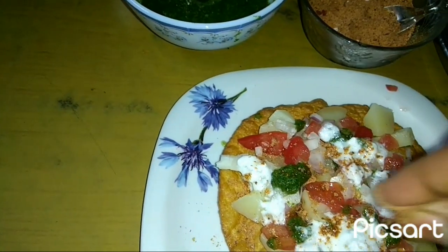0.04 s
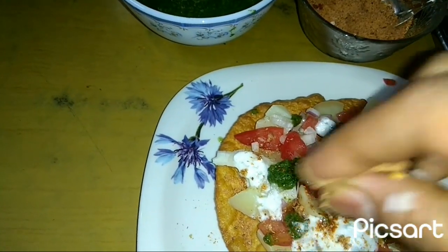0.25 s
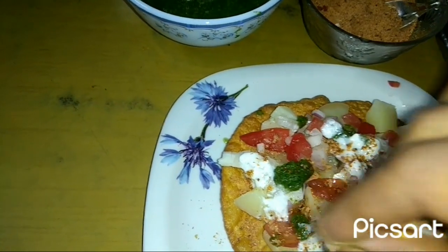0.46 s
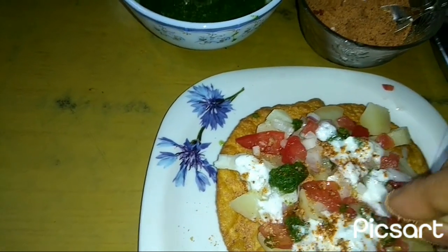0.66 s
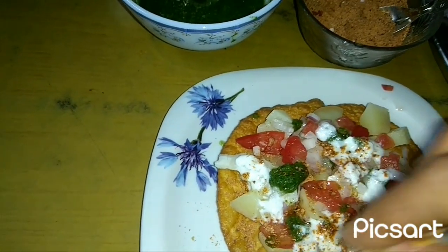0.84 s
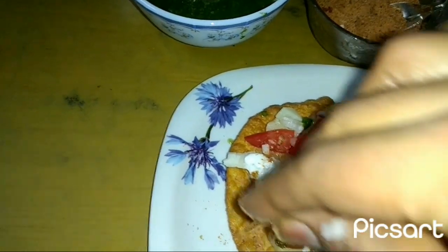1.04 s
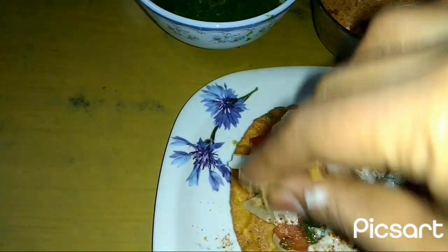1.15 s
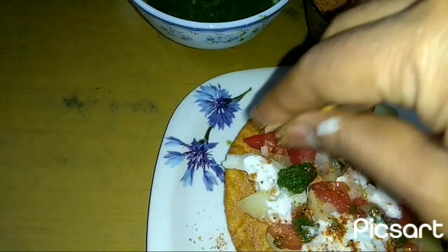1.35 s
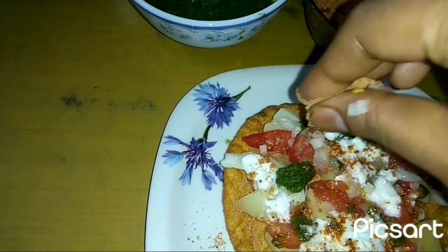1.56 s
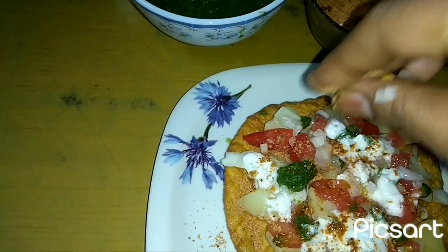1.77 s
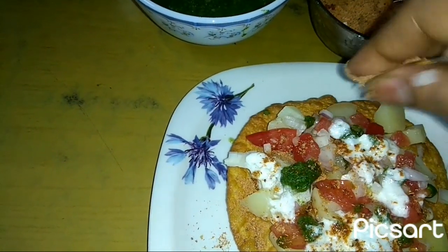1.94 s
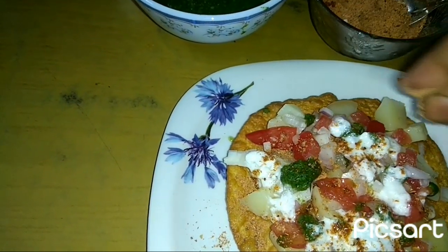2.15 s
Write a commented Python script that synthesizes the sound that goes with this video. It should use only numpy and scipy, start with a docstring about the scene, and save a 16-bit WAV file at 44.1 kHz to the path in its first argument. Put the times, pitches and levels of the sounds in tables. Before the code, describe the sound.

Fingertips rub spice powder over a plate in short, dry, scratchy strokes, close and mostly on the right. The fingers slip with a sharp snap at about 0.25 seconds, then more weakly at 1.05 and 1.9, each ringing briefly in a small kitchen. The rasping is strongest around 1.2 to 1.4 seconds and again from 1.8 to 2. Soft, low handling bumps come and go over a faint room hum.

```python
"""A small kitchen, a hand-held stereo phone close to fingertips rubbing spice powder over a plate.
The grains rasp in short strokes; three times the fingers stick and slip with a snap that rings in the room.
The hand holding the phone bumps it softly, over a faint room hum.
The left microphone lies in the phone's shadow, so the fingers are heard mostly on the right."""
import sys
import numpy as np
from scipy import signal
from scipy.fft import rfft, irfft
from scipy.io import wavfile

SR = 44100
rng = np.random.default_rng(int(sys.argv[2]) if len(sys.argv) > 2 else 0)


def wrap_up_sound(samples):
    """Save the sound to the file named by the first command line argument, as 16-bit audio."""
    columns = np.atleast_2d(samples).T
    # keep every value between -1 and 1, then stretch to whole-number steps
    tamed = np.clip(columns, -1, 1)
    steps = np.round(tamed * 32767).astype(np.int16)
    wavfile.write(sys.argv[1], SR, steps)


N = 97020

# Strokes of finger on thumb. Each row: peak time in seconds, level in dB, rise and fall in seconds,
# sizzle relative to rasp in dB, left relative to right in dB.
RUB_STROKES = [(.03, -64, 0.12, 0.053, -6, -7), (0.207, -49.5, 0.037, 0.09, 2, -0.5),
               (0.431, -45.5, 0.072, 0.038, -6.5, -2.5), (.524, -53.5, 0.0086, 0.012, 4.5, -7),
               (.685, -66, 0.011, 0.029, -28.5, -2.5), (0.782, -46, 0.014, .012, 2.5, -0.5),
               (.84, -62, .04, 0.036, -15, -8.5), (1.035, -52.5, 0.029, 0.028, 6, -4),
               (1.202, -39, 0.069, 0.045, -8, -5.5), (1.328, -41.5, 0.06, 0.077, -4, -8.5),
               (1.402, -46, 0.024, 0.01, -8, -10.5), (1.589, -53.5, 0.02, 0.013, 1.5, -11),
               (1.755, -48, 0.0096, 0.027, -20.5, -9.5), (1.792, -35, 0.0082, 0.0084, -9, -1),
               (1.83, -49.5, .035, 0.085, -5, -5), (1.963, -36.5, 0.063, 0.055, -10, -3),
               (2.104, -61, 0.023, 0.07, -20, 8.5), (2.179, -40.5, 0.0083, 0.007, 1, -12)]
# Single coarse grains cracking. Each row: time in seconds, level in dB, left relative to right in dB.
GRAIN_TICKS = [(.191, -51, 18), (.215, -47.5, 18), (1.745, -50, -9), (1.754, -47, -3.5), (2.004, -40, -6)]
# Handling bumps. Each row: peak time and width in seconds, pitch in Hz, left and right levels in dB.
PHONE_BUMPS = [(0.051, 0.014, 58.3, -34, -60), (0.123, 0.061, 52.5, -61, -46.5),
               (0.311, 0.034, 55, -61, -41), (.668, 0.0063, 60, -48, -34), (0.699, 0.02, 54, -38.5, -49.5),
               (.727, 0.0071, 80, -32, -40.5), (0.791, 0.055, 56.7, -47, -58),
               (0.949, 0.02, 60.7, -47, -42), (1.001, 0.013, 56.8, -34, -35.5),
               (1.69, 0.025, 54.5, -47.5, -60), (2.041, 0.0096, 59, -38.5, -58),
               (2.173, 0.029, 55.6, -60, -51)]
# Dull scrapes of skin. Each row: peak time, rise and fall in seconds, pitch and width in Hz, level in dB.
SKIN_SCUFFS = [(0.189, 0.021, 0.084, 418, 296, -59), (0.253, 0.0047, 0.021, 1450, 800, -41),
               (.57, 0.034, .018, 9600, 2200, -52), (.578, 0.031, 0.022, 860, 502, -63),
               (0.687, 0.015, 0.036, 6450, 2010, -57), (.815, 0.0097, 0.033, 2840, 590, -59.5),
               (1.052, 0.0065, 0.028, 900, 550, -43), (1.2, 0.035, 0.027, 2430, 547, -54.5),
               (1.61, 0.029, 0.033, 327, 194, -57), (1.755, .008, 0.02, 2200, 604, -64),
               (1.93, 0.0082, .008, 709, 400, -47.5), (1.96, 0.056, 0.065, 3330, 1200, -54),
               (2.098, .008, 0.029, 3430, 2330, -55)]
# Finger slips, a few to a snap. Each row: time in seconds, crack level in dB, the hollow's pitch and
# lower width in Hz, its level in dB, left relative to right in dB.
FINGER_SLIPS = [(0.234, -15.5, 3140, 700, -32, 5.5), (0.243, -27, 2780, 503, -28, 6),
                (0.2509, -13, 2820, 400, -17, 8), (0.2527, -8.5, 2584, 590, -14, 0.5),
                (0.255, -14, 3400, 900, -17, -3), (1.0350, -26.5, 2000, 196, -27.5, -3),
                (1.0460, -28, 2000, 200, -23.5, 3), (1.0580, -41, 2067, 200, -27, 0),
                (1.9040, -28, 2060, 262, -38, -9.5), (1.916, -34, 2110, 253, -25.5, 2),
                (1.929, -25.5, 2700, 700, -43, 1)]
# Dull finger knocks. Each row: peak time and fall in seconds, pitch in Hz, level in dB.
FINGER_KNOCKS = [(0.254, .004, 351.8, -36), (1.042, 0.0038, 785, -35), (1.076, 0.0093, 371.6, -38),
                 (1.928, 0.0045, 637, -44)]
# Spectra of room tone, coarse grains, fine grains and a slip's crack.
# Each row: frequency in Hz, relative spectral density in dB.
ROOM_TONE_SPECTRUM = [(25, -32.5), (40, -22.5), (58, -1), (100, 0), (160, -2.5), (230, 3.5), (340, -2.5),
                      (480, -15.5), (750, -9.5), (1100, -13.5), (1800, -19), (4000, -26), (9000, -26.5),
                      (16000, -35)]
RASP_SPECTRUM = [(500, -30), (1500, -21.5), (2300, -18), (3200, -19), (4500, -18), (5600, -9), (7000, -6),
                 (8300, 1), (10000, -2), (11500, -5.5), (13000, -19), (16000, -32)]
SIZZLE_SPECTRUM = [(500, -42), (7000, -29), (10500, -14.5), (12500, 0.5), (14500, -3), (16000, -7.5)]
CRACK_SPECTRUM = [(300, -32.5), (1000, -30), (1600, -19.5), (2200, -11.5), (3000, -16), (3800, -10),
                  (4700, -15), (6000, -2.5), (7000, -3), (7900, 3), (9700, 1), (11000, -7.5), (13000, -7),
                  (15000, -12.5), (16500, -22)]
# The phone's shadow on the left microphone. Each row: frequency in Hz, gain in dB.
LEFT_MIC_SHADOW = [(60, -5.5), (200, -11), (400, -12), (1000, -9.5), (2000, -12.5), (2900, -19),
                   (4200, -11), (6500, -16), (9000, -23), (11000, -4), (13000, -3), (15000, 2)]

ROOM_TONE_DB, MAINS_HZ, MAINS_DB = -57.5, 102.7, -72
GRAINS_PER_S, GRAIN_SPREAD_DB, SIZZLE_TRIM_DB = 6700, 1.7, -0.5
FLUTTER_DB, FLUTTER_PER_S = 1.0, 60
SLIP_S, TICK_RISE_S = 0.0012, 0.0012
ROOM_BUILD_S, ROOM_T60_S, ROOM_TREBLE_T60_S = 0.004, 0.26, 0.23
LEFT_LAG_S, TOP_HZ = 0.00014, 15450
TIME = np.arange(N) / SR
BIN_HZ = np.fft.rfftfreq(2048, 1 / SR)


def undb(db):
    """Decibels to gain."""
    return 10 ** (np.asarray(db) / 20)


def unit_rms(x):
    """Scale to an rms of 1."""
    return x / np.sqrt(np.mean(x ** 2))


def butter(x, hz, kind):
    """Gentle Butterworth filter."""
    return signal.sosfilt(signal.butter(2, hz, kind, fs=SR, output="sos"), x)


def curve(points):
    """Gain in dB at each bin, joining the points on a log-frequency axis."""
    hz, db = np.array(points, float).T
    return np.interp(np.log(BIN_HZ + 1), np.log(hz), db)


def resonance(hz, below_hz, above_hz):
    """Gain in dB of one broad resonance, with a width for each flank."""
    offset = BIN_HZ - hz
    return -29 * np.log10(1 + (offset / np.where(offset < 0, below_hz, above_hz)) ** 2)


def response(db):
    """Minimum-phase impulse response with the given gain at each bin."""
    cepstrum = irfft(np.log(undb(db)))
    half = len(cepstrum) // 2
    cepstrum[1:half] *= 2
    cepstrum[half + 1:] = 0
    return irfft(np.exp(rfft(cepstrum)))


def colour(x, db):
    """Filter that keeps the power of white noise."""
    impulse = response(db)
    return signal.fftconvolve(x, impulse[None] / np.linalg.norm(impulse), axes=-1)[:, :x.shape[1]]


def stroke(at, rise, fall):
    """Swell to a peak and fade."""
    return np.exp(-(np.abs(TIME - at) / np.where(TIME < at, rise, fall)) ** 1.5)


def grains():
    """Dense tiny clicks of unequal strength, mostly shared by the two microphones."""
    hits = rng.random((3, N)) < GRAINS_PER_S / SR
    clicks = hits * rng.standard_normal((3, N))
    clicks *= undb(GRAIN_SPREAD_DB * np.minimum(rng.exponential(size=(3, N)), 4))
    return unit_rms(clicks[:2] + 2.2 * clicks[2])


def flutter():
    """Uneven grip of skin on powder: a quick random waver of the gain."""
    knots = rng.standard_normal(1024)
    return undb(FLUTTER_DB * np.interp(TIME * FLUTTER_PER_S, np.arange(len(knots)), knots))


def room(x, wet_db):
    """Add the dense, short echo of table top and tiled walls."""
    t = np.arange(SR // 2) / SR
    low = butter(rng.standard_normal((2, len(t))), 5000, "low") * undb(-60 * t / ROOM_T60_S)
    high = butter(rng.standard_normal((2, len(t))), 5000, "high") * undb(-60 * t / ROOM_TREBLE_T60_S)
    echo = (low + high) * (1 - np.exp(-t / ROOM_BUILD_S))
    echo /= np.linalg.norm(echo, axis=1, keepdims=True)
    return x[:, :N] + undb(wet_db) * signal.fftconvolve(x, echo, axes=-1)[:, :N]


def room_tone():
    """Faint steady kitchen noise with a trace of mains hum."""
    noise = rng.standard_normal((3, N))
    air = colour(unit_rms(noise[:2] + 3.3 * noise[2]), curve(ROOM_TONE_SPECTRUM))
    return undb(ROOM_TONE_DB) * air + undb(MAINS_DB) * np.sin(2 * np.pi * MAINS_HZ * TIME)


def rubs():
    """Powder rubbed close to the phone: coarse grains rasp, fine ones sizzle and a few crack singly."""
    coarse_power, fine_power = 0, 0
    for at, db, rise, fall, sizzle_db, pan_db in RUB_STROKES:
        power = (undb([[db + pan_db], [db]]) * stroke(at, rise, fall)) ** 2
        coarse_power += power
        fine_power += power * undb(sizzle_db + SIZZLE_TRIM_DB) ** 2
    for at, db, pan_db in GRAIN_TICKS:
        coarse_power += (undb([[db + pan_db], [db]]) * stroke(at, TICK_RISE_S, 2 * TICK_RISE_S)) ** 2
    rasp = colour(grains() * flutter() * np.sqrt(coarse_power), curve(RASP_SPECTRUM))
    sizzle = colour(grains() * flutter() * np.sqrt(fine_power), curve(SIZZLE_SPECTRUM))
    return room(rasp + sizzle, wet_db=-8.5)


def bumps():
    """Handling noise: a brief low wobble and a little rumble in the phone at each shift of the grip."""
    rumble = undb(-13) * unit_rms(butter(rng.standard_normal((2, N)), [50, 175], "band"))
    shared_phases = rng.uniform(0, 2 * np.pi, (len(PHONE_BUMPS), 1, 1))
    mic_phases = shared_phases + 0.6 * rng.standard_normal((len(PHONE_BUMPS), 2, 1))
    out = 0
    for (at, width, hz, left_db, right_db), phase in zip(PHONE_BUMPS, mic_phases):
        swell = undb([[left_db], [right_db]]) / np.cosh(np.clip(1.75 * (TIME - at) / width, -50, 50))
        wobble = np.sin(2 * np.pi * hz * (TIME - at) + phase)
        out += swell * (wobble + rumble)
    return out


def scuffs_and_knocks():
    """Softer contacts of the fingers: grainy scrapes and short knocks, each with one resonance."""
    out = 0
    for at, rise, fall, hz, width_hz, db in SKIN_SCUFFS:
        out += undb(db) * colour(grains() * stroke(at, rise, fall), resonance(hz, width_hz, width_hz))
    for at, fall, hz, db in FINGER_KNOCKS:
        out += undb(db) * stroke(at, fall / 2, fall) * np.sin(2 * np.pi * hz * (TIME - at))
    return room(out, wet_db=-4.5)


def slips(size=4096):
    """A millisecond of skin letting go: a bright crack that rings the hollow between the fingers."""
    lead = size // 4
    t = (np.arange(size) - lead) / SR
    burst = np.exp(-(t / SLIP_S) ** 2)
    out = np.zeros((2, N + size))
    for at, crack_db, hollow_hz, width_hz, hollow_db, pan_db in FINGER_SLIPS:
        crack, puff = rng.standard_normal((2, 2, size)) * burst * undb([[pan_db], [0]])
        hollow = resonance(hollow_hz, below_hz=width_hz, above_hz=2.6 * width_hz)
        start = int(at * SR) - lead
        out[:, start:start + size] += undb(crack_db) * colour(crack, curve(CRACK_SPECTRUM))
        out[:, start:start + size] += undb(hollow_db) * colour(puff, hollow)
    return room(out, wet_db=3)


def scene():
    """Airborne sound reaches the left microphone shaded and late; bumps come through the phone's body."""
    left, right = rubs() + slips() + scuffs_and_knocks() + room_tone()
    left = signal.fftconvolve(left, response(curve(LEFT_MIC_SHADOW)))[:N]
    left = np.pad(left, (int(LEFT_LAG_S * SR), 0))[:N]
    return np.array([left, right]) + bumps()


def record(dry):
    """The phone clips at full scale and cuts the top of the treble."""
    lowpass = signal.ellip(8, 0.2, 70, TOP_HZ, fs=SR, output="sos")
    return signal.sosfilt(lowpass, np.clip(dry, -1, 1))


dry = scene()
out = record(dry)
wrap_up_sound(out)
```